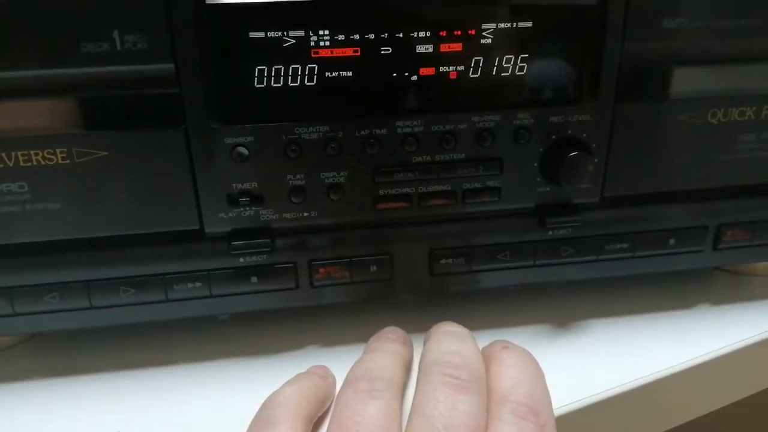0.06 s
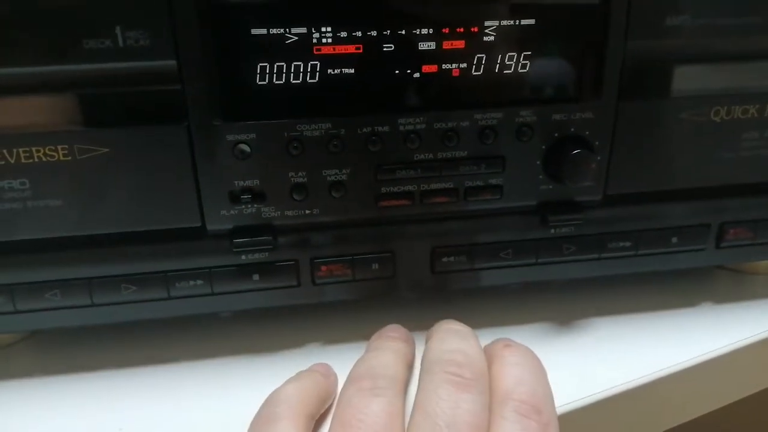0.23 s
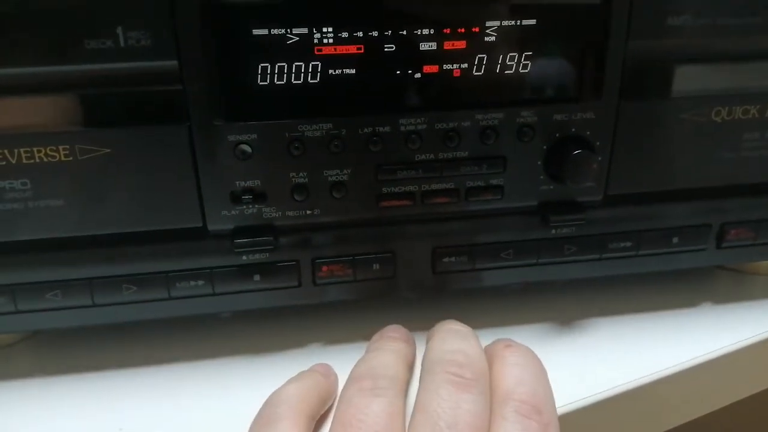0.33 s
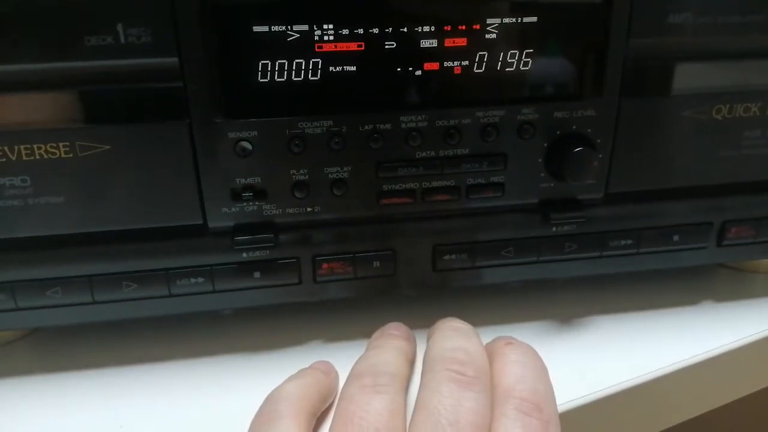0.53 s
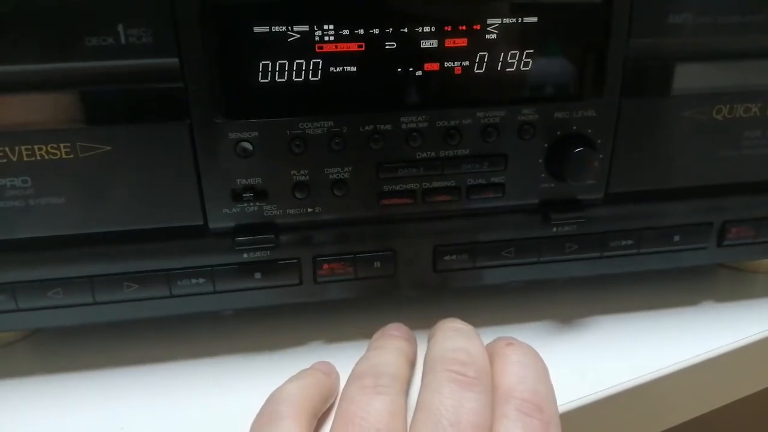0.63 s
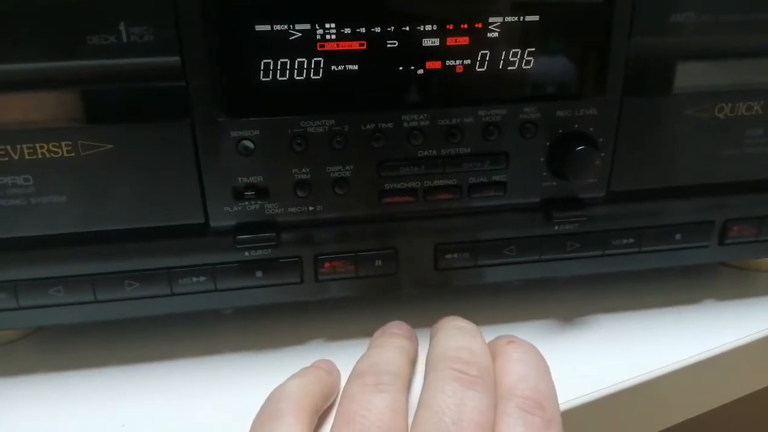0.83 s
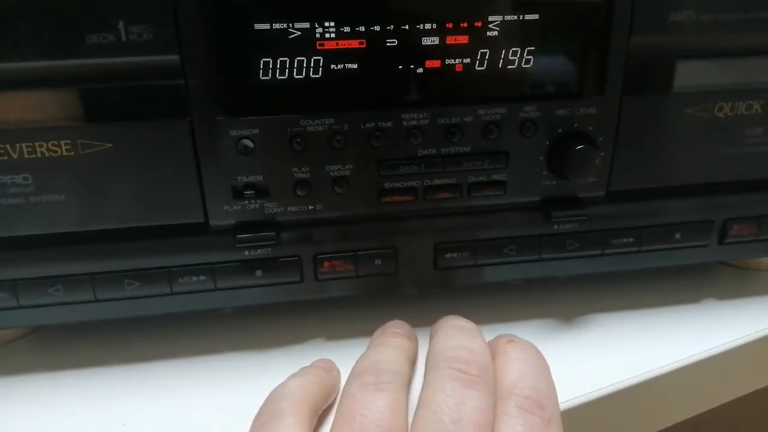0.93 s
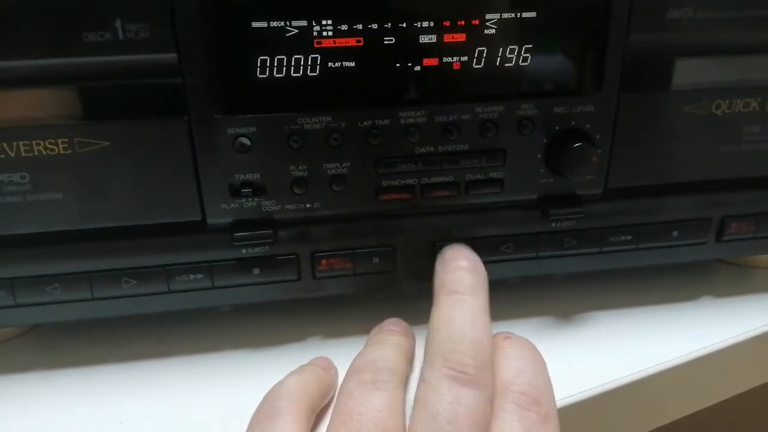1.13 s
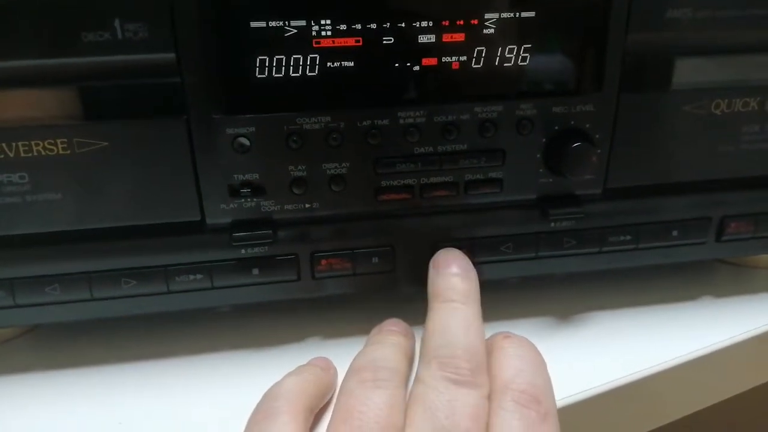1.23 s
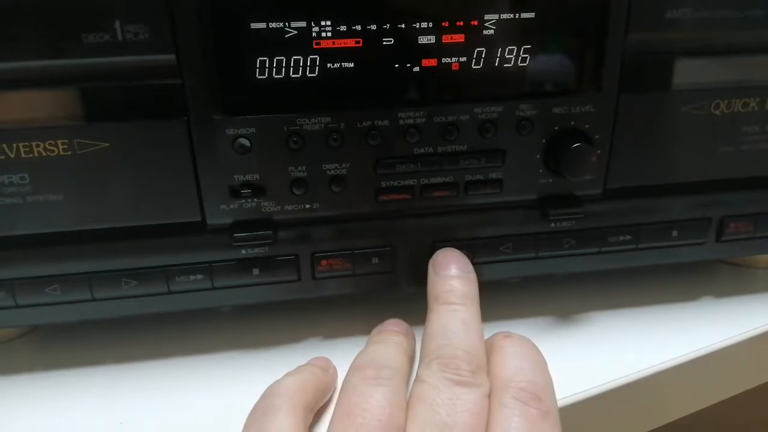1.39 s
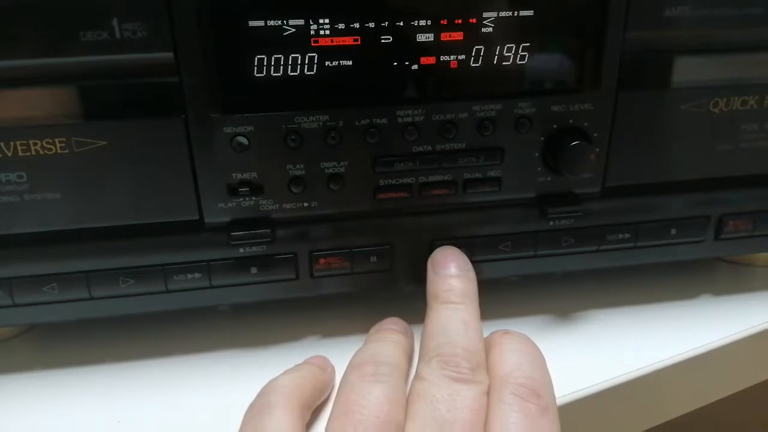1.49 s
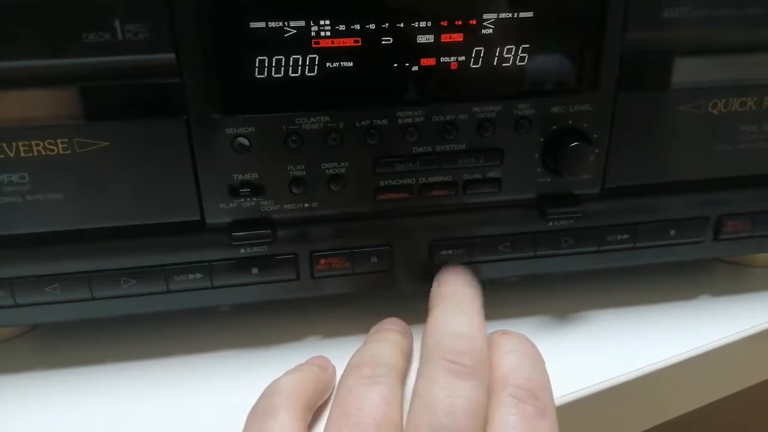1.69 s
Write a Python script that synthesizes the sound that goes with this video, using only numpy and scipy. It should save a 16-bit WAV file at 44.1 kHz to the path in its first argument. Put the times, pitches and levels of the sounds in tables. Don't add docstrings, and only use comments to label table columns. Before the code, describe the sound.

Cassette deck mechanism ticks, slams and latches loudly, then a plastic key clicks down and up

```python
import sys
import numpy as np
from scipy import signal
from scipy.fft import rfft, irfft, next_fast_len
from scipy.io import wavfile
from scipy.ndimage import uniform_filter1d, map_coordinates

SR = 44100
rng = np.random.default_rng(int(sys.argv[2]) if len(sys.argv) > 2 else 0)


def materialize(psi):
    bounded = np.clip(np.atleast_2d(psi).T, -1, 1)
    quanta = np.round(bounded * 32767).astype(np.int16)
    wavfile.write(sys.argv[1], SR, quanta)


def invert_db(x):
    u = np.asarray(x, float) / 20
    return 10 ** u


N = 77175

# f/Hz, correlation
CORRELATION = [(60, 0.87), (240, 0.72), (700, 0.52), (1500, -0.19), (3770, 0.0018), (15000, 0.016)]
# f/Hz, level/dB
METAL_CRACK = [(250, -39), (500, -20.5), (842, 0.5), (2100, -15), (3350, -9.5), (4200, -15.5),
               (6850, -12.5), (8500, -21), (15500, -24), (16800, -80)]
# f/Hz, level/dB
THIN_CRACK = [(290, -34), (800, -23), (2100, -17), (2700, -7), (3300, 2), (4420, -6.5), (6280, 2),
              (9000, -13.5), (15100, -7), (16900, -49)]
# f/Hz, level/dB
SOFT_CRACK = [(500, -46), (2000, -19), (3300, 2), (4300, -12), (7500, -36), (9500, -37), (16000, -48)]
# f/Hz, level/dB
HEAVY_TAIL = [(150, -35.5), (250, -8.5), (444, -9), (816, -2), (3840, -10), (6940, -4.5), (9010, -19),
              (14700, -11.5), (16000, -71)]
# f/Hz, level/dB
LIGHT_TAIL = [(710, -33), (1900, -14.5), (2910, -10), (4280, -7.5), (5610, -2.5), (7200, -12.5),
              (9000, -17.5), (15600, -53)]


def unit(x):
    return x / np.sqrt(np.mean(x ** 2) + 1e-20)


def along(points, hz):
    f, v = np.transpose(points)
    return np.interp(np.log(hz + 1), np.log(f + 1), v)


def over_time(points):
    return np.interp(np.arange(N) / SR, *np.transpose(points))


def wobble(rate):
    knots = rng.standard_normal(int(N * rate / SR) + 4)
    return map_coordinates(knots, [np.arange(N) * rate / SR])


def filtered(x, response):
    m = next_fast_len(N + SR // 2)
    return irfft(rfft(x, m) * response(np.fft.rfftfreq(m, 1 / SR)), m)[..., :N]


def causal(points):
    def response(f):
        c = irfft(np.log(invert_db(along(points, f)) + 1e-6))
        c[1:len(c) // 2] *= 2
        c[len(c) // 2 + 1:] = 0
        return np.exp(rfft(c))[:len(f)]
    return response


def resonance(f, hz, width):
    return 1j * f * width / (hz * hz - f * f + 1j * f * width)


def stereo_angle(hz):
    return np.arccos(np.clip(along(CORRELATION, hz), -1, 1)) / 2


def cabinet(f):
    # f/Hz, width/Hz, level/dB
    cabinet_modes = [(678, 20, 5), (950, 80, -3), (1141, 72, -3), (1850, 114, -3), (2527, 610, -5.5),
                     (3113, 450, -2), (5505, 870, -2), (6830, 114, 1)]
    return 1 + sum(invert_db(db) * resonance(f, hz, width) for hz, width, db in cabinet_modes)


def room(x):
    # f/Hz, T60/s
    decay_times = [(150, 0.94), (700, 0.6), (2500, 0.98), (6000, 0.67), (10000, 0.5), (16000, 0.17)]
    hz, t, z = signal.stft(rng.standard_normal((2, SR)), SR, nperseg=256)
    angle = stereo_angle(hz)[:, None]
    z = z[0] * np.cos(angle) + z[1] * np.sin(angle) * np.array([1, -1])[:, None, None]
    decay = invert_db(-60 * t / along(decay_times, hz)[:, None])
    build_up = 1 - np.exp(-t / 0.014)
    tail = signal.istft(z * (decay * build_up), SR, nperseg=256)[1]
    return signal.fftconvolve(x.mean(0)[None], tail / np.linalg.norm(tail[0]), axes=1)[:, :N]


def rush(spectrum, patchy_db):
    z = signal.stft(rng.standard_normal((2, N)), nperseg=512)[2]
    field = uniform_filter1d(rng.standard_normal(z.shape[1:]), 6, 0)
    field = uniform_filter1d(field, 14, 1)
    pair = signal.istft(z * invert_db(patchy_db * unit(field)), nperseg=512)[1][:, :N]

    def mid_side(hz):
        angle = stereo_angle(hz)
        return invert_db(along(spectrum, hz)) * np.array([np.cos(angle), np.sin(angle)])

    mid, side = filtered(pair, mid_side)
    return unit(np.array([mid + side, mid - side]))


def struck(contacts, modes, crack, tail, ring_db, crack_db, wet_db, ring_wet_db, apart, rise, push,
           push_hz=1800, gritty=1):
    t = np.arange(N) / SR
    ports = np.array([[1], [-1]])
    grit, blows = np.zeros((3, N)), np.zeros(N)
    for s, db, length in contacts:
        u = np.clip(t - s, 0, None) / max(length, 1e-4)
        envelope = (1 - np.exp(-rise * u)) * np.exp(-u)
        noise = rng.standard_normal((3, N)) * rng.exponential(1, N) ** .5
        grit += gritty * invert_db(db) * envelope * noise
        blows[round((s + length / rise) * SR)] += invert_db(db) * np.sqrt(length * SR / 2)

    difference = grit[1] * ports + .5 * grit[2] * np.array([[1], [0]])
    force = grit[0] + filtered(difference, lambda f: apart * 1j * f / (1j * f + 1500))

    def push_response(f):
        lead_s = 7e-5
        return np.exp(1j * np.pi * f * lead_s * ports) / (1 + 1j * f / push_hz)

    def body(f):
        total = 0
        for k, (hz, db, t60) in enumerate(modes):
            width = 2.0 / max(t60, .002)
            total = total + (-1) ** k * invert_db(db) * resonance(f, hz, width) * np.sqrt(300 / width)
        return total

    clean = push * filtered(blows, push_response)
    knock = filtered(force, lambda f: 1j * f / (1j * f + 1800)) + clean
    ring = invert_db(ring_db) * filtered(knock, body)
    answer = filtered(blows, lambda f: causal(tail)(f) * cabinet(f))
    wet = room(invert_db(wet_db) * answer + invert_db(ring_wet_db) * ring)
    return ring + invert_db(crack_db) * filtered(force, causal(crack)) + wet


def hiss():
    # f/Hz, level/dB
    hiss_spectrum = [(200, 1.5), (330, -8), (520, -12), (880, -6.5), (1840, -17), (5900, -15), (7300, -15),
                     (7900, -25), (15600, -24.5), (16000, -65)]
    # t/s, level/dB
    hiss_swell = [(.7, 2.5), (.95, 4.5), (1.2, 2.5), (1.75, 2)]
    level_db = -66 + over_time(hiss_swell) + 0.13 * wobble(4.4)
    return invert_db(level_db) * unit(filtered(rush(hiss_spectrum, patchy_db=0.9), cabinet))


def rumble():
    # f/Hz, level/dB
    rumble_spectrum = [(12, -34), (25, 4), (50, -7), (70, -13), (136, 0), (248, -16.5), (400, -20),
                       (520, -42)]
    # t/s, level/dB
    rumble_swell = [(0, -9), (.2, 1.7), (0.502, 5), (.8, 4.5), (.95, -1), (1.2, -9), (1.4, 4), (1.75, 1)]
    level_db = -65.5 + over_time(rumble_swell) + wobble(12.45)
    return invert_db(level_db) * rush(rumble_spectrum, patchy_db=2.0)


def bench_and_bearing():
    # t/s, f/Hz, level/dB, length/s
    thuds = [(.33, 224, -58.5, 0.045), (.3, 329.6, -57.5, 0.14), (.4, 246, -50.5, 0.022),
             (.78, 65.7, -56, 0.072), (.82, 150.3, -61, 0.066), (1.38, 142.2, -62, 0.12),
             (1.42, 177, -68.5, 0.08), (1.5, 60.6, -63, 0.13), (1.7, 63.4, -58, 0.058)]
    # t/s, f/Hz, level/dB, length/s
    whistles = [(1.41, 10150, -82, .04), (1.45, 10150, -82, .025), (.9, 10150, -87, .1)]
    t = np.arange(N) / SR
    rough = invert_db(3.1 * np.array([wobble(39.4), wobble(40.0)]))
    total = np.zeros(N)
    for s, hz, db, length in [*thuds, *whistles]:
        envelope = np.exp(-.5 * ((t - s) / (length / 2)) ** 2)
        total += invert_db(db) * envelope * np.sin(2 * np.pi * hz * (t - s))
    return rough * total


def motor():
    # t/s, f/Hz
    shaft_speed = [(0, 86.7), (.3, 85.54), (.55, 75.8), (.8, 72.7), (1.75, 71.86)]
    # order, free level/dB, loaded level/dB
    orders = [(1, -72.5, -74.5), (2, -65.5, -72), (3, -78.5, -82), (4, -87, -73), (6, -88.5, -82),
              (9, -81.5, -81)]
    t = np.arange(N) / SR
    turn = 2 * np.pi * np.cumsum(over_time(shaft_speed) * (1 + 0.0036 * wobble(11.5))) / SR
    load = 1 / (1 + np.exp((0.65 - t) / 0.013))
    hum = np.zeros(N)
    for k, free_db, loaded_db in orders:
        level_db = free_db + (loaded_db - free_db) * load + 1.9 * wobble(15.86)
        hum += invert_db(level_db) * np.sin(k * turn + rng.uniform(0, 2 * np.pi))
    return np.sqrt(2) * hum


def flywheel():
    # t/s, f/Hz, level/dB
    growl_path = [(.18, 174.4, -72), (.27, 180.4, -54), (.34, 175.5, -58), (.45, 171, -57.5),
                  (0.554, 154.3, -53.5), (.63, 144.3, -65), (0.698, 117, -56), (0.781, 103.8, -65),
                  (.92, 96, -79)]
    t = np.arange(N) / SR
    s, hz, db = np.transpose(growl_path)
    spin = 2 * np.pi * np.cumsum(np.interp(t, s, hz) * (1 + 0.0907 * wobble(35.53))) / SR
    level_db = np.interp(t, s, db, left=-120, right=-120) + 1.2 * wobble(29.64)
    tone = np.sin(spin) + 0.72 * wobble(59.8) * np.cos(spin) + 0.46 * wobble(44.6) * np.sin(1.4 * spin)
    return np.sqrt(2) * invert_db(level_db) * tone


def plate():
    plate_mode = (.211, .312, 836, -35.5, .6)
    start, stop, hz, db, t60 = plate_mode
    t = np.arange(N) / SR
    u = np.clip(t - start, 0, None)
    held = (1 - np.exp(-u / .006)) * np.exp(-np.clip(t - stop, 0, None) / .008)
    return invert_db(db - 60 * u / t60) * held * np.sin(2 * np.pi * hz * u + .25 * wobble(40))


def cam_ticks():
    # t/s, peak level/dB, scrape length/s
    tick_contacts = [
        (0.0283, -45, 0.0042),
        (0.0762, -50, 0.0066),
        (0.1231, -55, 0.0049),
        (0.1715, -50, 0.0025),
        (1.2825, -51, 0.004),
    ]
    # f/Hz, level/dB, T60/s
    gear_modes = [(3410, -7.5, 0.0079), (5150, -14, .01), (6770, -7, 0.024), (10150, -20, .008)]
    return struck(tick_contacts, gear_modes, SOFT_CRACK, LIGHT_TAIL, ring_db=9, crack_db=-2.5,
                  wet_db=-11, ring_wet_db=1, apart=0.88, rise=14.0, push=0.53)


def spring_snap():
    # t/s, peak level/dB, scrape length/s
    snap_contact = [(1.6716, -33.5, 0.00094)]
    # f/Hz, level/dB, T60/s
    spring_modes = [(5700, -13, 0.01), (7500, 0, 0.012), (8430, -4, 0.0072), (11600, -16, 0.0038),
                    (14600, -9, 0.01)]
    return struck(snap_contact, spring_modes, THIN_CRACK, LIGHT_TAIL, ring_db=14.5, crack_db=2,
                  wet_db=-9, ring_wet_db=-14, apart=1.0, rise=11, push=0.64, push_hz=9000, gritty=0.79)


def key_up():
    # t/s, peak level/dB, scrape length/s
    up_contacts = [
        (1.6704, -28, 0.00053),
        (1.6735, -31, 0.00045),
        (1.6765, -35.5, 0.00043),
    ]
    # f/Hz, level/dB, T60/s
    up_modes = [(996, 8.5, 0.024), (1010, 1, .13), (1060, -0.5, 0.073), (3010, 3.5, .012), (3424, 9, 0.019),
                (3800, 3.5, 0.041)]
    # f/Hz, level/dB
    up_tail = [(410, -60), (1000, -7), (1350, -15), (3300, -13), (4500, -49), (7000, -9), (9000, -29),
               (15600, -45)]
    return struck(up_contacts, up_modes, SOFT_CRACK, up_tail, ring_db=7.0, crack_db=13,
                  wet_db=3.5, ring_wet_db=-11, apart=1.0, rise=9.9, push=0.65, push_hz=4000, gritty=0.52)


def key_down():
    # t/s, peak level/dB, scrape length/s
    down_contacts = [
        (1.4693, -24.5, 0.00083),
        (1.4711, -29, 0.00076),
        (1.4765, -40, .001),
        (1.479, -34, 0.0015),
    ]
    # f/Hz, level/dB, T60/s
    down_modes = [(954, -2, 0.057), (1360, -10, 0.031), (1670, -14, 0.032), (2610, -3, 0.0047),
                  (3020, 8, 0.0098), (3540, 6, .016), (4060, -2, 0.023), (4600, 5.5, 0.016),
                  (5960, 9, 0.02), (6330, 9.5, 0.021), (7360, -11, 0.0079), (9300, -7, 0.0079),
                  (10600, -19, .008)]
    # f/Hz, level/dB
    down_crack = [(800, -23), (2100, -21), (2600, -7.5), (3300, 0), (4420, -5), (6280, 2.5), (9000, -11.5),
                  (11000, -12), (16500, -37)]
    return struck(down_contacts, down_modes, down_crack, LIGHT_TAIL, ring_db=1.0, crack_db=10,
                  wet_db=0.5, ring_wet_db=-24, apart=0.85, rise=11.5, push=1.32, push_hz=7000, gritty=0.71)


def levers():
    # t/s, peak level/dB, scrape length/s
    lever_contacts = [(.2045, -24, .004), (.2072, -46, 0.0013), (.2128, -22.5, 0.0012),
                      (.2168, -27.5, 0.0013), (.2695, -31.5, 0.0021)]
    # f/Hz, level/dB, T60/s
    lever_modes = [(5510, 0.5, 0.024), (6870, 4.5, .015), (7100, -1, .012), (10100, -2.5, 0.0045),
                   (11800, -4.5, 0.0053)]
    return struck(lever_contacts, lever_modes, THIN_CRACK, LIGHT_TAIL, ring_db=7, crack_db=2.7,
                  wet_db=-7, ring_wet_db=-22, apart=0.57, rise=4, push=0.55)


def latch():
    # t/s, peak level/dB, scrape length/s
    latch_contacts = [(.3238, -32, 0.0018), (.3262, -20.5, .002), (.3298, -27, 0.0022),
                      (.3332, -25.5, 0.00205), (.340, -26, .002), (.3435, -29.5, .002), (.349, -37, .003),
                      (.355, -38.5, .003)]
    # f/Hz, level/dB, T60/s
    latch_modes = [(675, -1.5, 0.031), (800, -4, .03), (963, -4.5, 0.06), (1174, -11, 0.041),
                   (1333, 0.5, 0.07), (3220, -5.5, 0.036), (3350, -1.5, 0.016), (3440, -6, 0.022),
                   (5100, -8, 0.056), (6470, -1, 0.03), (7500, -2, 0.027)]
    return struck(latch_contacts, latch_modes, METAL_CRACK, HEAVY_TAIL, ring_db=4.5, crack_db=10.5,
                  wet_db=0.07, ring_wet_db=-29, apart=1.24, rise=5.2, push=1.25, push_hz=2500, gritty=1.0)


def slam():
    # t/s, peak level/dB, scrape length/s
    slam_contacts = [(.2088, -17.5, .0022), (.2112, -24, .002), (.2165, -23, .0024), (.2255, -28.5, .004),
                     (.2315, -28.5, .003), (.242, -31, .0072), (.262, -39, 0.0067), (.2665, -28, 0.00515),
                     (.277, -30, 0.0042)]
    # f/Hz, level/dB, T60/s
    chassis_modes = [(712, -9.5, 0.026), (942, -5, 0.058), (1074, -21, 0.57), (1344, -3, 0.075),
                     (2290, -11.5, .08), (2761, -2.5, 0.067), (3220, 1.5, 0.015), (3360, 4.1, 0.037),
                     (5230, -15, 0.026), (7140, -12, 0.02), (9600, -14, 0.0066), (11940, -12, 0.029)]
    return struck(slam_contacts, chassis_modes, METAL_CRACK, HEAVY_TAIL, ring_db=4, crack_db=11.0,
                  wet_db=2.0, ring_wet_db=-25, apart=1.5, rise=5.17, push=1.25, push_hz=2550, gritty=0.96)


def scene():
    mechanism = slam() + latch() + levers()
    controls = spring_snap() + cam_ticks() + key_down() + key_up()
    floor = hiss() + rumble()
    running = plate() + motor() + flywheel() + bench_and_bearing()
    return mechanism + controls + floor + running


def low_pass(x):
    return signal.sosfilt(signal.butter(12, 16690, fs=SR, output="sos"), x)


def record(dry):
    # f/Hz, left-right level/dB
    port_balance = [(110, -0.5), (200, 2.5), (700, 1.5), (1290, 1.5), (2380, -3), (4400, -8.5), (8120, 5),
                    (15000, -2.5)]

    def microphone(f):
        colors = [causal([(hz, sign * db / 2) for hz, db in port_balance])(f) for sign in (1, -1)]
        low_cut = 1j * f / (1j * f + 45)
        high_cut = 1 / (1 + (f / 16450) ** 90)
        return np.array(colors) * low_cut * high_cut

    return low_pass(filtered(dry, microphone))


dry = scene()
out = record(dry)
materialize(out)
```